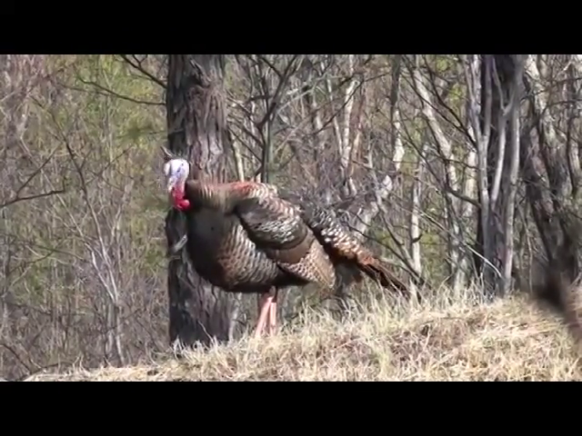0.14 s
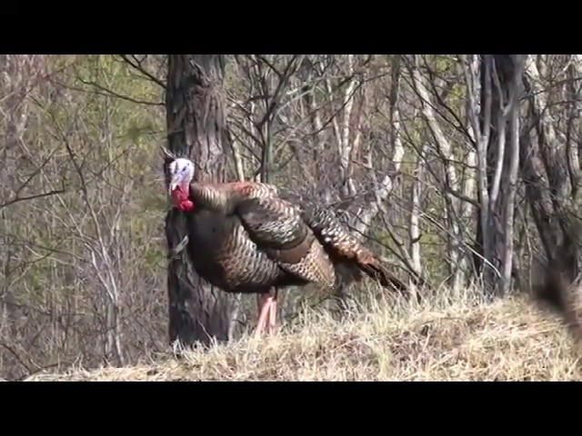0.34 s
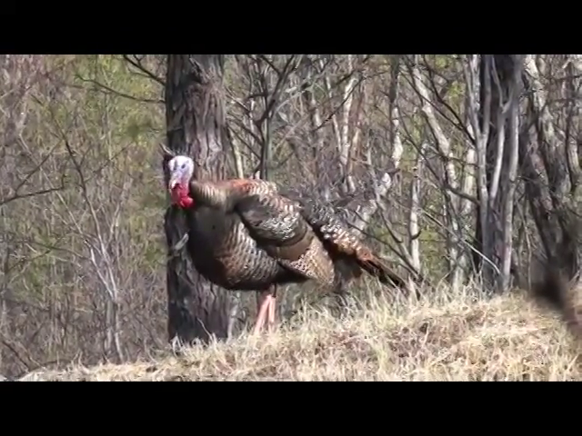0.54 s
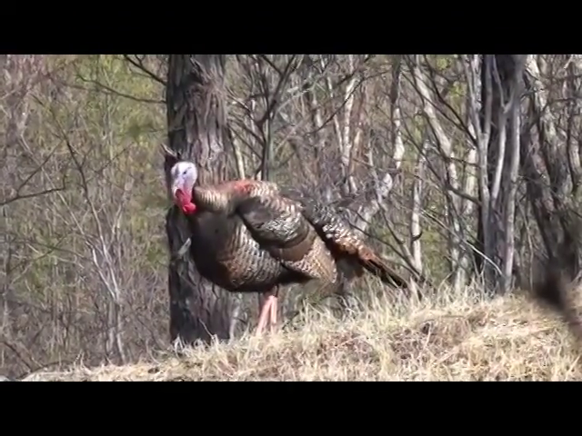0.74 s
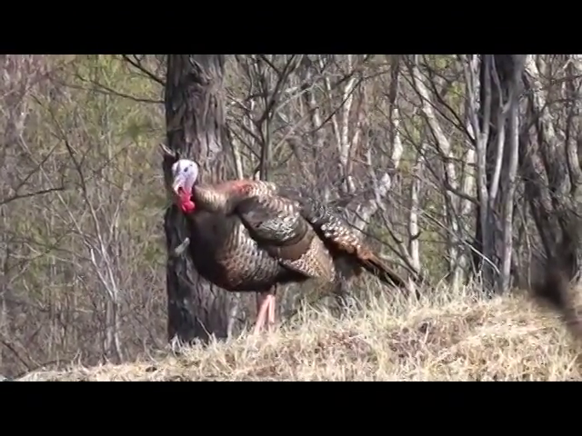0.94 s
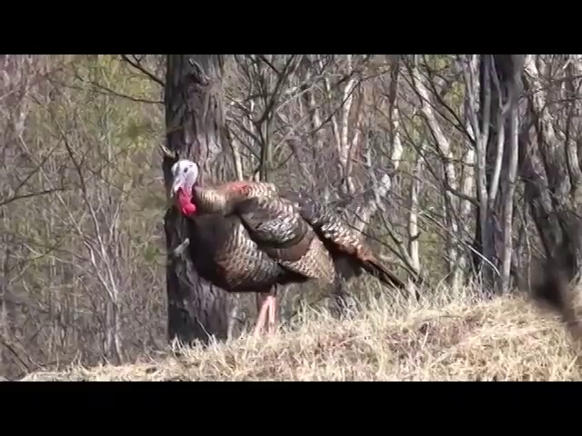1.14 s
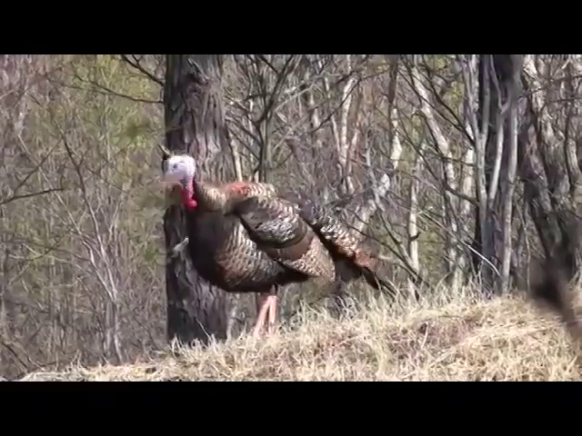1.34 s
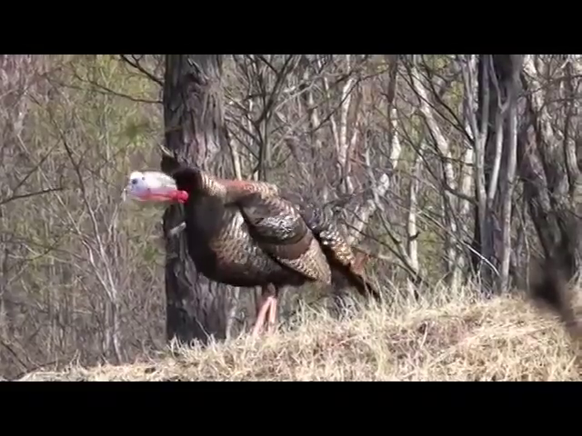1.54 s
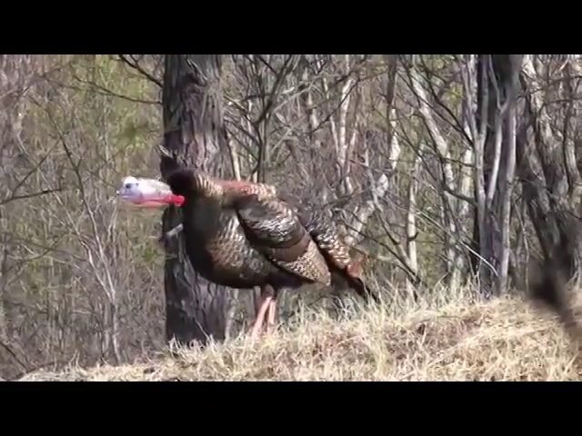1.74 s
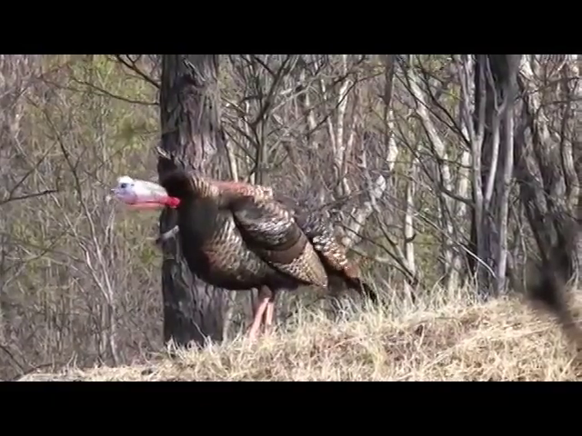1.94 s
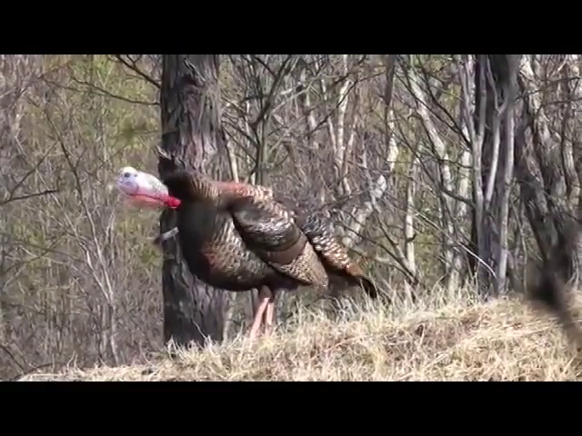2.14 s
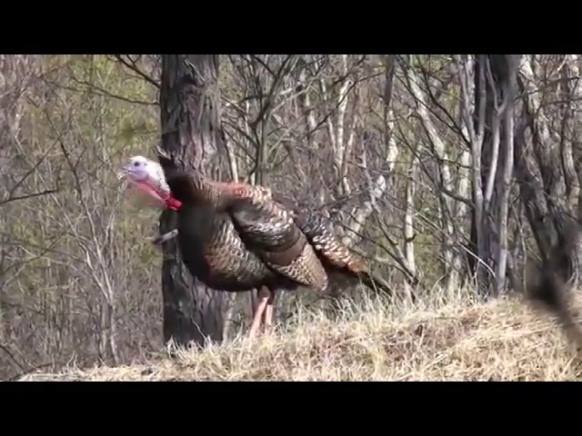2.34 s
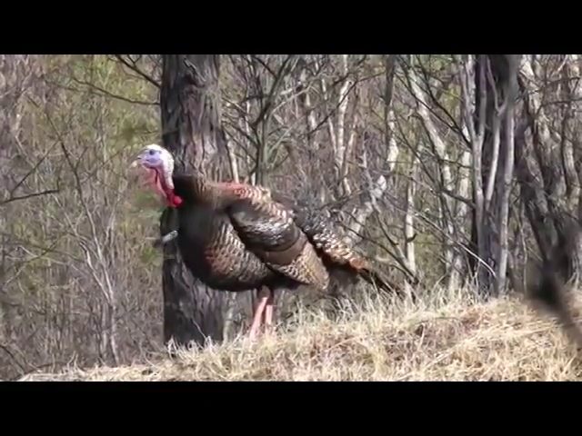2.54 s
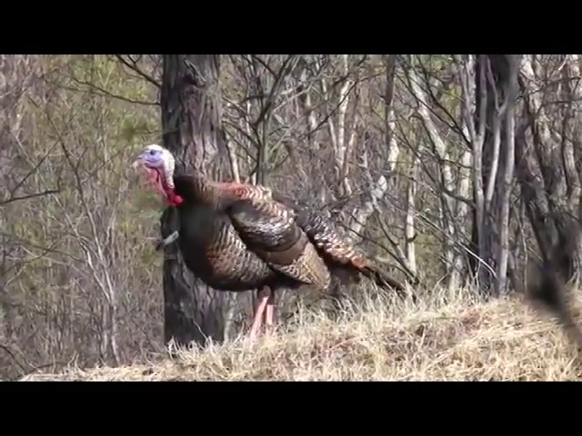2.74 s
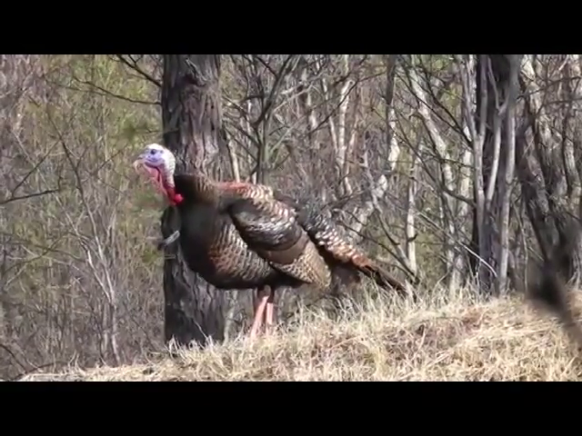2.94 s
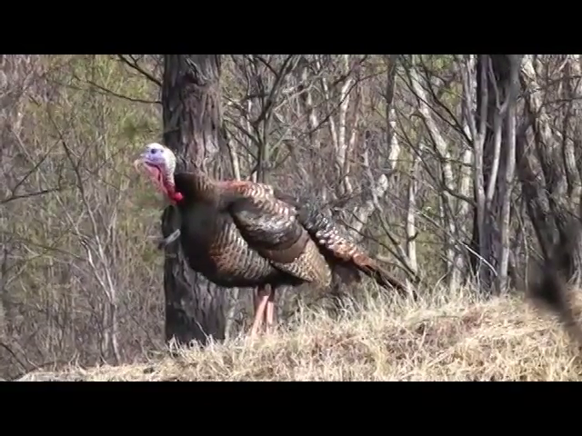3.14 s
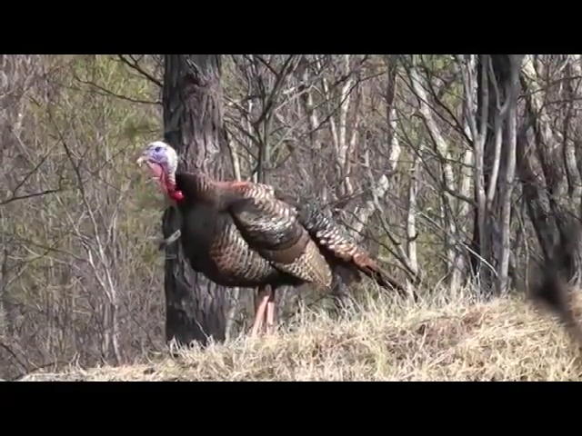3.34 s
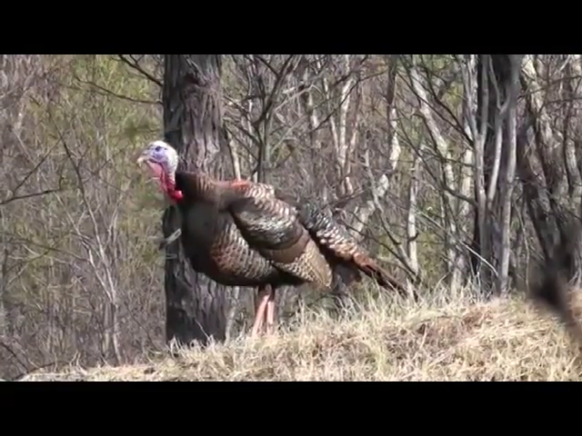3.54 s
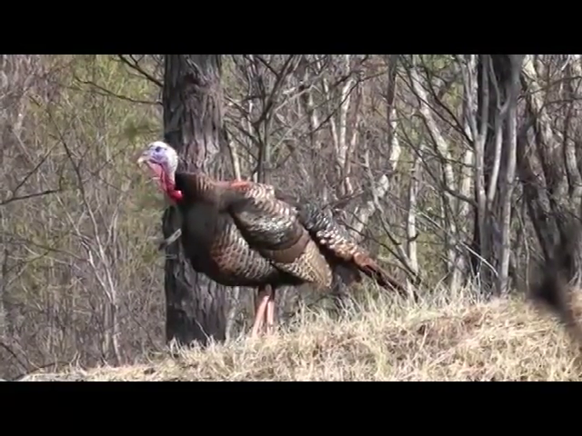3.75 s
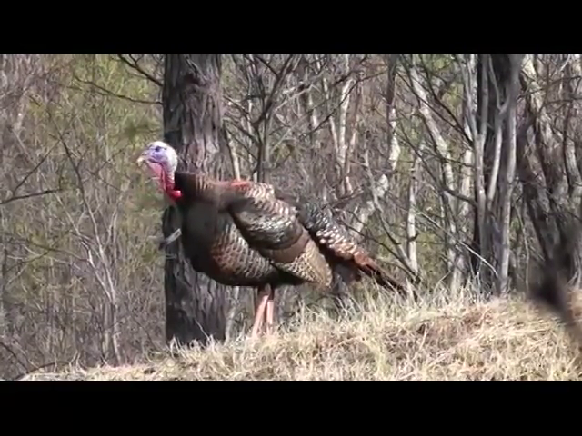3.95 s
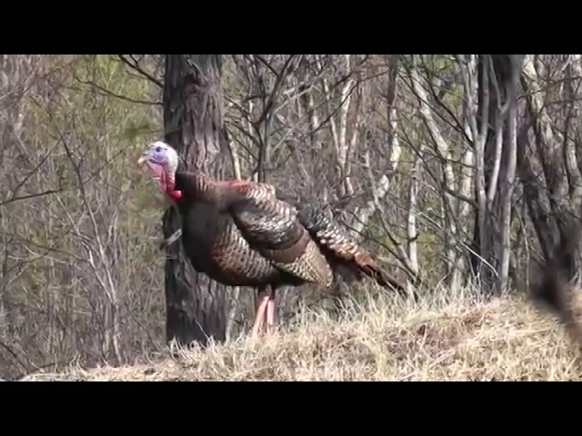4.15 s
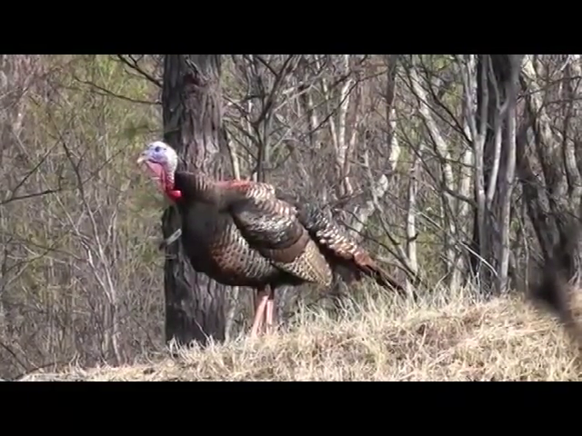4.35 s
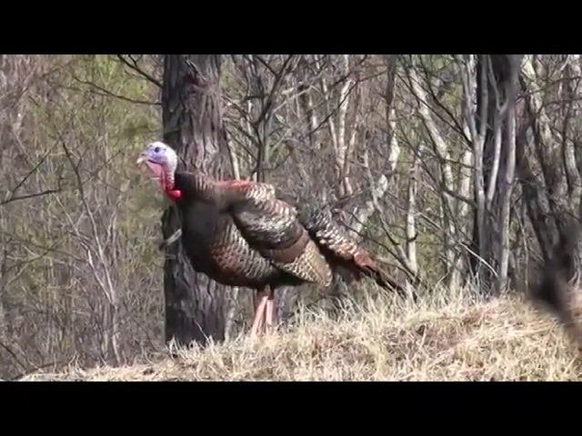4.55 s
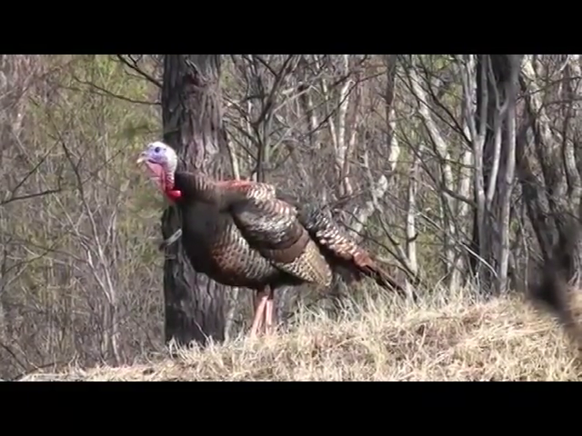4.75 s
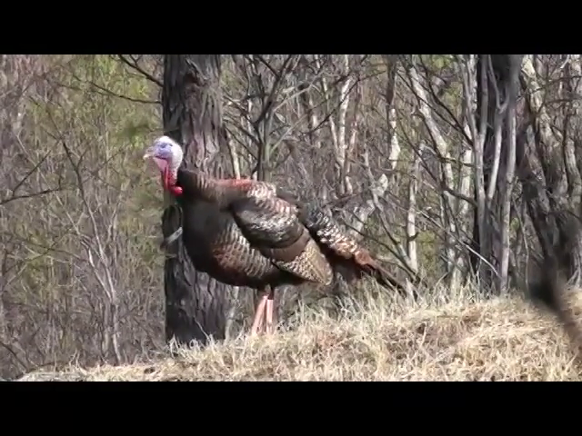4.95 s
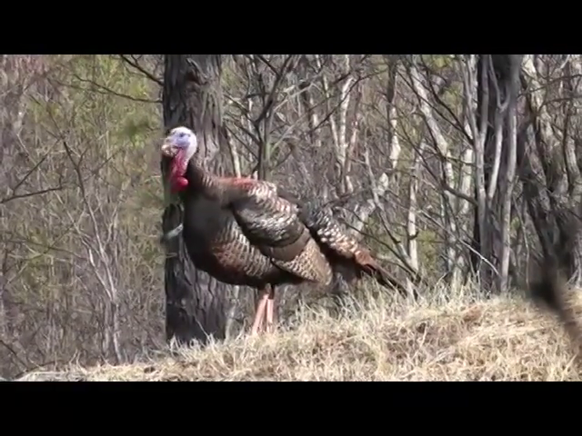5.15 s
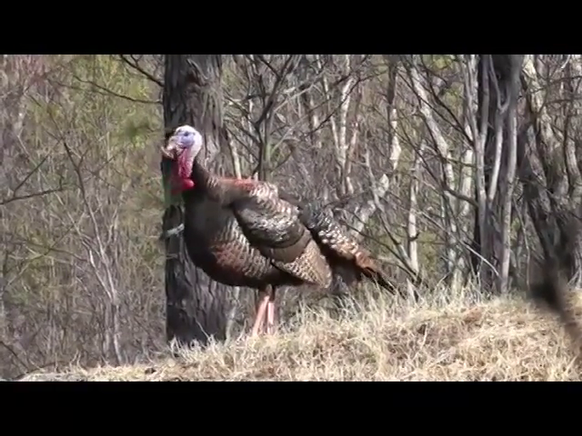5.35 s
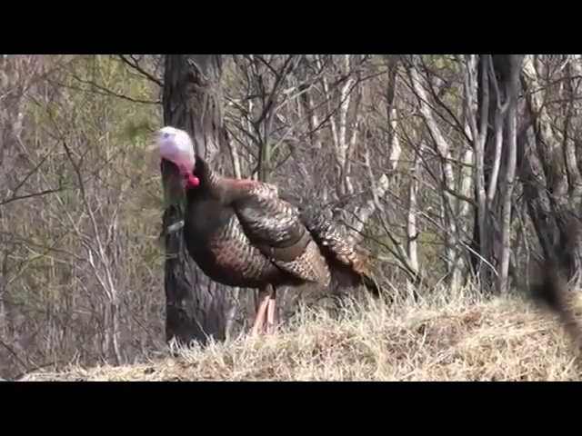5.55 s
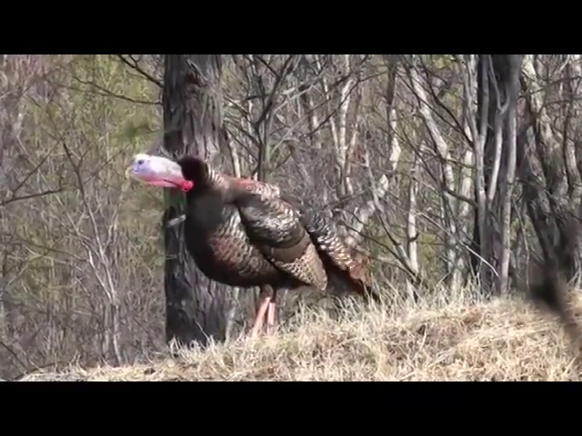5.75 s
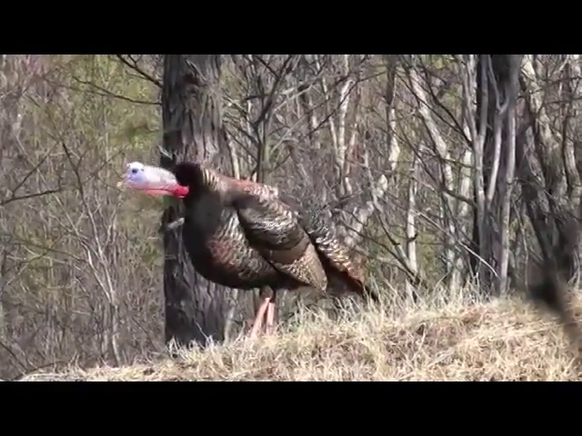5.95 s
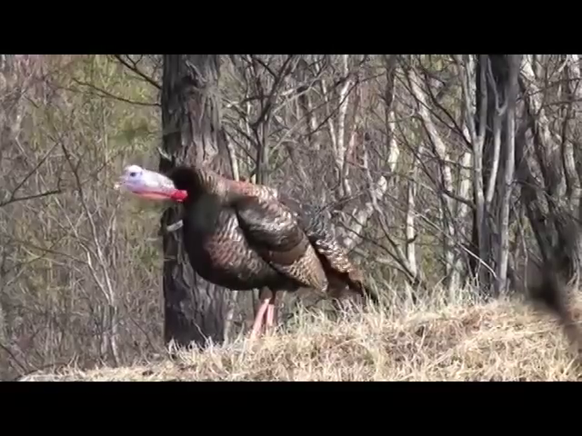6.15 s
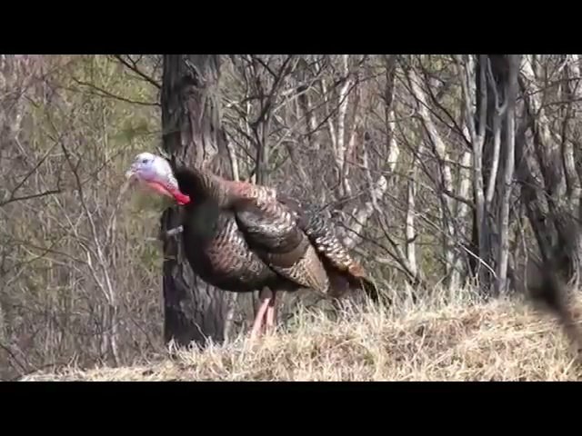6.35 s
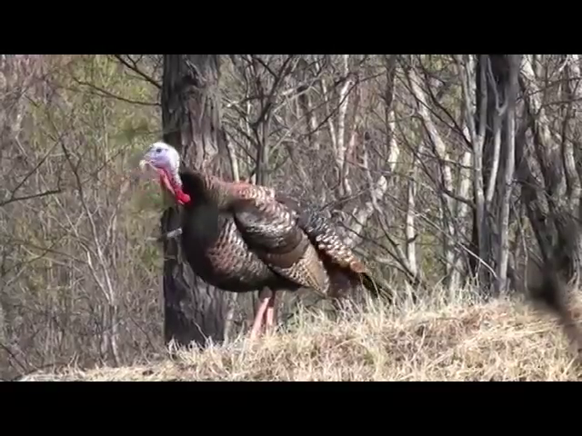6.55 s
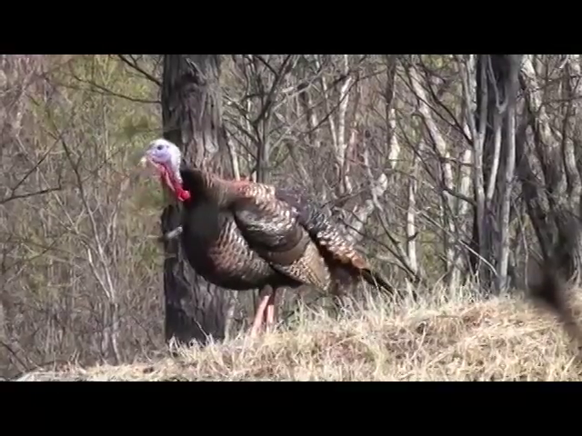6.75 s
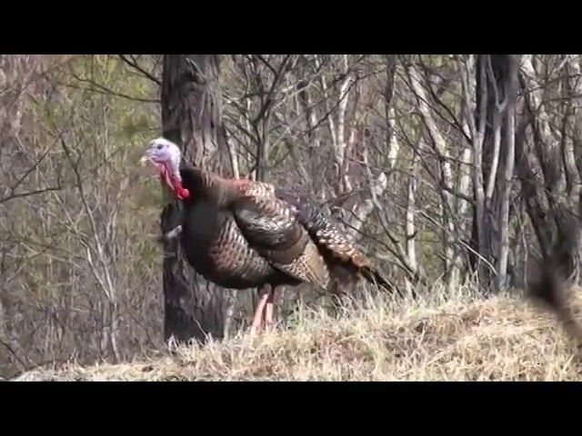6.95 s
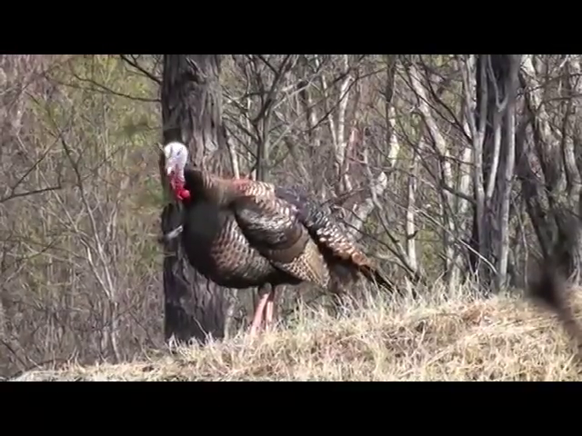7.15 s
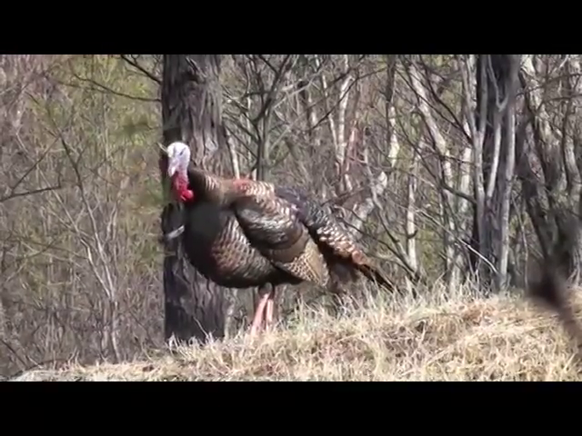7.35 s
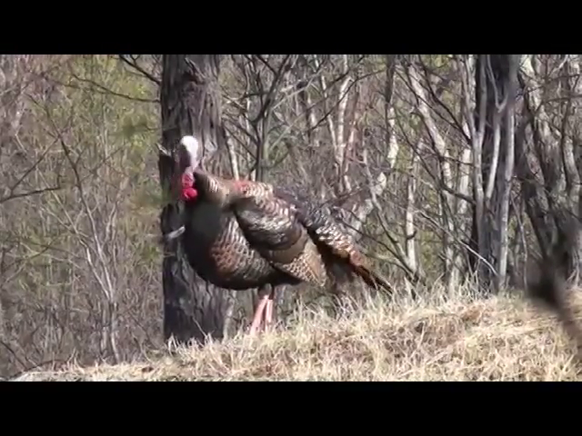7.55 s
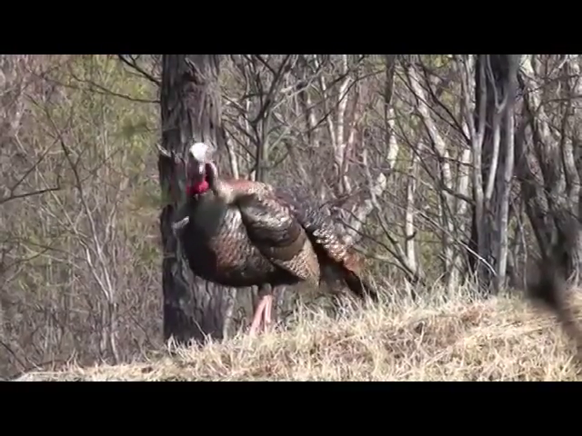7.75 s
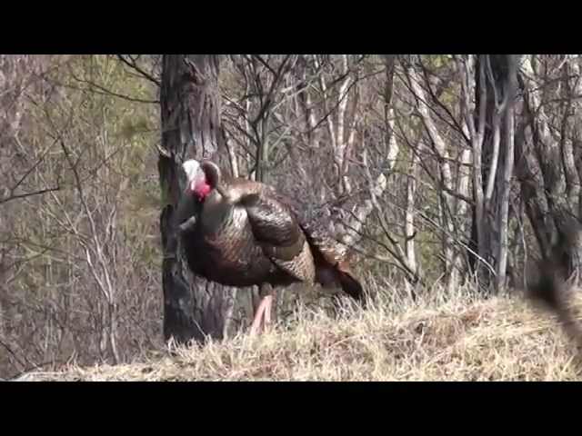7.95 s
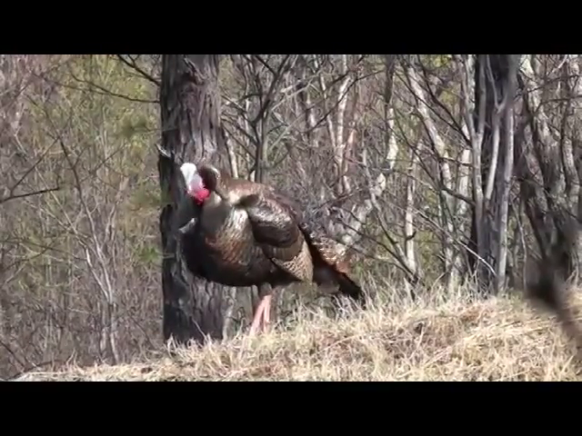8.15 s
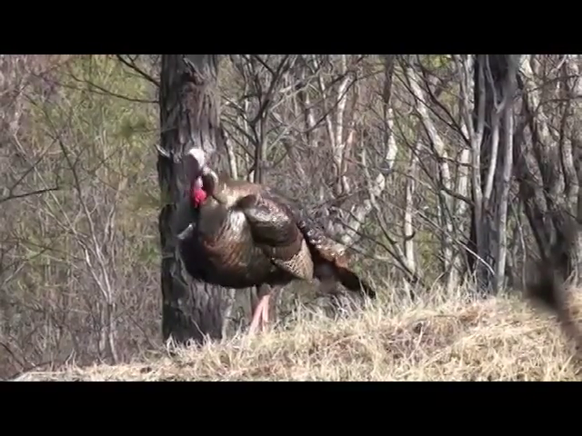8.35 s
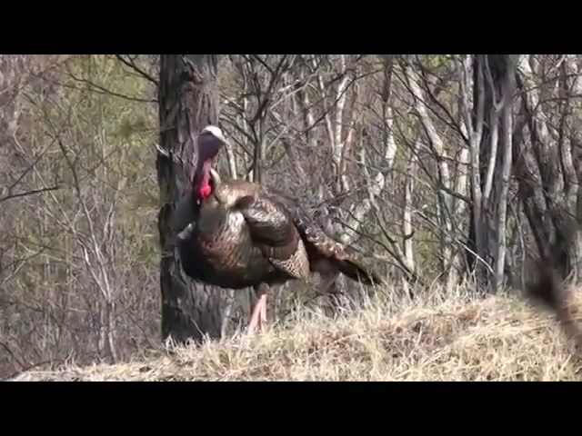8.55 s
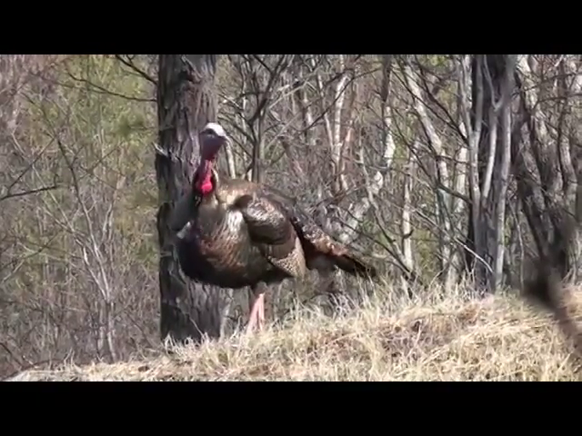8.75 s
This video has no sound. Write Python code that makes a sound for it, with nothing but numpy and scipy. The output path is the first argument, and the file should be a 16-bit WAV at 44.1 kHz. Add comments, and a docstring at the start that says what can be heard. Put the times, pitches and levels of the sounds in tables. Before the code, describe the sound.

Close raspy hen-like yelps from a reed call on the left, answered by a wild turkey's rattling gobbles among bare trees, with wind buffeting.

```python
"""Wind buffets the microphone ports over a steady hush; then hen yelps from a reed call come close on the left.
A wild turkey among bare trees answers with three gobbles: pulses and breath excite windpipe resonances.
Yelps are sums of harmonics with pulsing hiss; small birds far off are gliding sines, a twig a noise burst.
Decaying noise makes the echo of the wood, and a slow-release limiter ducks everything after loud sounds."""
import sys
import numpy as np
from scipy import signal
from scipy.fft import rfft, irfft
from scipy.io import wavfile
from scipy.ndimage import uniform_filter1d

SR = 44100
rng = np.random.default_rng(int(sys.argv[2]) if len(sys.argv) > 2 else 0)


def inscribe(sig):
    """Save sig as 16-bit PCM at rate SR to the path in sys.argv[1].

    A 1-D sig is mono; a 2-D sig holds one channel per row.
    Samples are clipped to [-1, 1] before scaling.
    """
    pcm = np.round(np.clip(np.atleast_2d(sig).T, -1, 1) * 32767)
    wavfile.write(sys.argv[1], SR, pcm.astype(np.int16))


N = 392049


def from_db(db):
    """Logarithmic level: 20 dB is a factor of ten in amplitude."""
    return 10 ** (np.asarray(db) / 20)


def at_hz(points, hz):
    """Spectral envelope: table values interpolated on a log-frequency axis."""
    table_hz, values = np.transpose(points)
    return np.interp(np.log(hz), np.log(table_hz), values)


def smooth_noise(hz, size):
    """Low-pass filtering: two equal poles leave noise wandering at about hz, with spread 1."""
    pole = np.exp(-2 * np.pi * hz / SR)
    noise = rng.standard_normal(2 * size)
    wander = signal.lfilter([1], [1, -2 * pole, pole * pole], noise)[size:]   # settled half
    return wander / wander.std()


def resonate(x, hz, width_hz):
    """Cascaded resonance: two equal resonators rise softly; a unit click peaks near 1."""
    radius, angle = np.exp(-np.pi * width_hz / SR), 2 * np.pi * hz / SR
    poles = [1, -2 * radius * np.cos(angle), radius * radius]
    gain = 2 * np.e * (1 - radius) * np.sin(angle) ** 2
    return signal.lfilter([gain], np.convolve(poles, poles), x)


def highpass(x, order, hz):
    """High-pass filtering: a Butterworth slope removes what lies below hz."""
    return signal.sosfilt(signal.butter(order, hz, "high", fs=SR, output="sos"), x)


def add(out, start_s, x):
    """Superposition: mix x in from a start time."""
    i = round(start_s * SR)
    out[..., i:i + x.shape[-1]] += x[..., :N - i]


# likeness of the two ports: (frequency [Hz], left-right correlation [0-1])
PORT_LIKENESS = [(60, 0.55), (130, .55), (300, .15), (3100, 0.54), (6800, 0.83), (15000, 1)]


def coloured_noise(spectrum):
    """Partial coherence: shaped mid and side noise sets the likeness of the ports; overall rms 1."""
    hz = np.maximum(np.fft.rfftfreq(N, 1 / SR), 1)
    mid, side = rfft(rng.standard_normal((2, N))) * from_db(at_hz(spectrum, hz))
    alike = at_hz(PORT_LIKENESS, hz)
    out = irfft(np.sqrt(1 + alike) * mid + np.sqrt(1 - alike) * side * [[1], [-1]], N)
    return out / out.std()


# course of the wind before its lumps: (time [s], level [dB])
WIND_COURSE = [(0, -55.5), (.45, -54), (.6, -44), (.78, -50), (1.2, -59), (1.9, -52), (2.6, -39),
               (3.15, -33), (3.7, -39), (4.2, -52), (4.8, -45), (5.2, -59), (6.2, -48.5), (6.7, -59),
               (7.8, -56), (8.3, -52), (8.6, -42)]
# spectrum of the rumble: (frequency [Hz], relative density [dB])
WIND_SPECTRUM = [(20, -16.5), (54, 3.5), (102, 2), (150, -8.5), (289, -29.5), (520, -62), (2000, -95)]


def wind(lumpy_db=4.5, gusty_db=5.0, flap_db=-8.0, flap_follows=.6):
    """Turbulent pressure: shared lumps modulate partly alike port noise; strong gusts reach higher."""
    s, course_db = np.transpose(WIND_COURSE)
    db = np.interp(np.arange(N) / SR, s, course_db)
    lumps = lumpy_db * np.array([smooth_noise(7.6, N), smooth_noise(23, N)])   # own rate in each channel
    lumps += gusty_db * smooth_noise(6.1, N)   # shared by both
    rumble = coloured_noise(WIND_SPECTRUM)
    flap = highpass(rumble, order=2, hz=110)
    flap_gain = from_db(flap_db + flap_follows * (db - db.max()))
    return from_db(db + lumps) * (rumble + flap_gain * flap) * from_db([[1.2], [-1.2]])


# spectrum of the steady hush: (frequency [Hz], relative density [dB])
AIR_SPECTRUM = [(120, -38), (200, -0.5), (471, -2.5), (1190, -11), (1650, -16.5), (2910, -23.5),
                (10800, -26), (14500, -31), (15600, -43)]


def air_hush(level_db=-55.5):
    """Stationary noise: one fixed spectrum at a constant level."""
    return from_db(level_db) * coloured_noise(AIR_SPECTRUM)


def cluck(hz, swell_s, fall):
    """Damped oscillation: a swelling and dying tone whose pitch sags; envelope peak 1."""
    t = np.arange(round(.06 * SR)) / SR
    shape = (t / swell_s * np.exp(1 - t / swell_s)) ** 3.2
    return shape * np.sin(2 * np.pi * hz * t * (1 + fall * (1 - t / (2 * swell_s))))


# envelope over the reed's harmonics: (frequency [Hz], relative level [dB])
REED_SPECTRUM = [(400, -23.5), (715, -12), (1120, -3), (1700, -4.5), (2250, -1), (2880, -11), (3700, -24),
                 (4600, -41), (5800, -48), (7300, -24), (8600, -60)]
# side on which the reed is heard: (frequency [Hz], left minus right [dB])
REED_LEAN = [(300, 1.5), (700, 7.5), (1290, 14), (2380, 7.5), (4400, 3), (8120, 5), (12000, 0.5)]
# spectrum of the air through the reed: (frequency [Hz], relative level [dB])
REED_AIR = [(300, -27.5), (1100, -4.5), (2400, 12), (3500, -8), (4300, -16), (5000, -27), (6300, -30),
            (7300, -17), (8000, -29), (8650, -58), (9200, -31), (9700, -27), (10600, -31), (11400, -26),
            (12600, -36), (13600, -30), (14900, -25)]
# first harmonic against the envelope: (middle pitch [Hz], lift [dB])
FIRST_HARMONIC = [(700, 1.5), (770, 0), (830, -5), (950, -3), (1100, -4), (1200, -7), (1400, 2), (1600, 3)]
# clear: low clean opening; raspy: high hoarse opening; smooth: high opening without rasp;
# held: high register carried on; low: after the break; rise: slide up; squeak: the reed pinches shut.
# stage: (start against middle [dB], end against middle [dB], roughness [0-1], treble lift [dB],
#         first harmonic lift [dB])
YELP_STAGES = {"clear": (6, -6.5, .07, 5, 10), "raspy": (7.5, 1.5, .3, 0, 0), "smooth": (9, 1, .15, 2, -1),
               "held": (-1, -1, .08, 4, 2), "low": (1, -6, .12, 0, 0), "rise": (-5, -9, .2, 2, 0),
               "squeak": (9, -14, .36, -1, 2)}
# reed notes before jitter and opening slides: (stage, start [s], end [s], start pitch [Hz],
#         middle pitch [Hz], end pitch [Hz], middle level [dB])
YELP_NOTES = [("clear", .697, .736, 916, 902, 1050, -9), ("held", .737, .787, 1086, 1400, 1430, -12),
              ("held", .787, .851, 1486, 1170, 1177, -10.5), ("rise", .853, .874, 1205, 1447, 1670, -14.5),
              ("raspy", .957, .976, 1140, 1120, 1133, -10), ("low", .975, 1.027, 730, 747, 860, -12),
              ("squeak", 1.024, 1.034, 1500, 1600, 1700, -27),
              ("raspy", 1.159, 1.189, 1418, 1106, 1080, -13), ("low", 1.19, 1.229, 680, 712, 840, -14),
              ("squeak", 1.226, 1.237, 1450, 1550, 1650, -27),
              ("raspy", 1.398, 1.421, 1160, 1090, 1040, -14), ("low", 1.421, 1.454, 680, 700, 790, -15),
              ("squeak", 1.452, 1.47, 1450, 1480, 1600, -23),
              ("raspy", 1.639, 1.666, 1233, 1001, 1134, -16.5), ("low", 1.668, 1.694, 673, 700, 790, -18),
              ("squeak", 1.692, 1.708, 1450, 1550, 1750, -24),
              ("clear", 4.962, 5.001, 840, 836, 980, -14.5), ("rise", 5.0, 5.02, 974, 1156, 1470, -19.5),
              ("smooth", 5.075, 5.11, 1240, 1195, 1090, -12.5), ("low", 5.109, 5.142, 800, 840, 878, -11.5),
              ("squeak", 5.139, 5.16, 1480, 1456, 1570, -22),
              ("raspy", 5.263, 5.296, 1358, 1082, 1020, -11.5), ("low", 5.298, 5.336, 711, 762, 850, -11.5),
              ("squeak", 5.331, 5.347, 1600, 1680, 1750, -23),
              ("raspy", 5.495, 5.54, 1230, 1120, 1110, -15.5), ("low", 5.531, 5.557, 682, 760, 790, -17),
              ("squeak", 5.554, 5.574, 1370, 1440, 1430, -21),
              ("raspy", 5.748, 5.773, 1250, 1036, 1100, -15), ("low", 5.775, 5.804, 661, 699, 780, -16),
              ("squeak", 5.801, 5.817, 1500, 1520, 1600, -22),
              ("clear", 6.864, 6.892, 903, 937, 1030, -11.5), ("low", 6.891, 6.905, 653, 730, 800, -14),
              ("squeak", 6.906, 6.928, 1240, 1340, 1390, -21),
              ("smooth", 6.972, 6.996, 1320, 1206, 1198, -11), ("low", 6.994, 7.022, 787, 835, 840, -17),
              ("rise", 6.996, 7.039, 1192, 1314, 1570, -15),
              ("smooth", 7.126, 7.161, 1373, 1238, 1114, -13), ("held", 7.16, 7.197, 1152, 1138, 1205, -12),
              ("squeak", 7.197, 7.221, 1460, 1563, 1660, -20),
              ("raspy", 7.335, 7.375, 1310, 1113, 1130, -15), ("low", 7.374, 7.409, 708, 760, 840, -15.5),
              ("squeak", 7.405, 7.421, 1550, 1600, 1700, -24),
              ("raspy", 7.563, 7.58, 1300, 1190, 1170, -14), ("held", 7.579, 7.595, 1010, 1004, 990, -13),
              ("low", 7.595, 7.623, 712, 725, 820, -15), ("squeak", 7.621, 7.639, 1506, 1600, 1700, -23),
              ("raspy", 7.801, 7.824, 1257, 1075, 1157, -13), ("low", 7.824, 7.854, 690, 714, 768, -15),
              ("squeak", 7.852, 7.878, 1320, 1498, 1680, -27),
              ("raspy", 8.026, 8.051, 1167, 1095, 963, -15.5), ("low", 8.05, 8.086, 681, 684, 780, -17),
              ("squeak", 8.083, 8.095, 1350, 1480, 1600, -28),
              ("clear", 8.751, 8.787, 1084, 934, 1056, -12),
              ("rise", 8.788, 8.814, 1146, 1380, 1730, -13.5), ("raspy", 8.845, 8.88, 1392, 1160, 975, -14),
              ("low", 8.88, 8.898, 860, 818, 840, -13)]


def yelps(jitter=0.1, hiss_db=-18.5, rasp=.6, edge_s=.002, pop_db=17.0, pop_s=0.014, treble=.8,
          patchy_db=2.2, crack=.6, spread=.3, blur=0.37, catch_s=.015, catch_slide=.2, catch_dip=.6,
          settle_s=.036, top_varies_db=2.5, uneven_db=2.5, lead_in_db=-19.0, lead_in_s=.006,
          kick=.17, kick_s=.004, thump_db=-22.0, thump_hz=310):
    """Self-sustained reed oscillation: wandering harmonics of a latex reed, hiss pulsing with each cycle."""
    out = np.zeros((2, N))
    air = np.zeros((3, N))   # rasp, thin hiss, and the top that differs from note to note
    order = np.arange(1, 12)[:, None]
    for stage, start, end, start_hz, middle_hz, end_hz, db in YELP_NOTES:
        start_db, end_db, rough, treble_db, first_db = YELP_STAGES[stage]
        opening = stage in ("clear", "raspy", "smooth")
        t = np.arange(round((end - start + 2 * edge_s) * SR)) / SR
        u = np.minimum(t / (end - start), 1)
        pitch = np.polyval(np.polyfit([0, .5, 1], [start_hz, middle_hz, end_hz], 2), u)
        level = from_db(db + np.interp(u, [0, .5, 1], [start_db, 0, end_db]))
        level *= np.clip(np.minimum((t / (1.6 * edge_s)) ** 2, (t[-1] - t) / (2 * edge_s)), 0, 1)

        if stage in ("raspy", "smooth"):   # the first puff bends the reed sharp
            pitch *= 1 + kick * np.exp(-t / kick_s)
        if opening:   # it also thumps in the open mouth, in the left channel
            thump = from_db(db + thump_db) * cluck(thump_hz, swell_s=.006, fall=.2)
            add(out, start, thump * [[1], [0]])
            # a faint noise ramp leads into each opening note
            lead_in = np.linspace(0, 1, round(lead_in_s * SR))
            lead_in_noise = lead_in * rng.standard_normal(len(lead_in))
            add(air[0], start - lead_in_s + edge_s, from_db(db + lead_in_db) * lead_in_noise)
        if stage == "raspy":   # the reed catches, slides up and slips back, then settles
            slips = rng.uniform(.15, .35) + t / (catch_s * rng.uniform(.9, 1.1))
            settling = np.exp(-t / settle_s)
            pitch *= 1 + catch_slide * settling * (slips % 1 - .5)
            level *= 1 - catch_dip * settling * np.cos(np.pi * slips) ** 8

        rough = rough * (1 + crack * u ** 6)   # the tone cracks as the note ends
        jittered = pitch * (1 + jitter * rough * smooth_noise(150, len(t)))
        phase = 2 * np.pi * np.cumsum(jittered) / SR
        heights = from_db(at_hz(REED_SPECTRUM, order * pitch))
        uneven = uneven_db * (order > 1) * rng.standard_normal(order.shape)
        heights *= from_db(treble_db * (order * pitch > 5500) + uneven)
        pop = opening * pop_db * np.exp(-t / pop_s)   # dull while the mouth opens
        heights[0] *= from_db(first_db + at_hz(FIRST_HARMONIC, middle_hz) + pop)
        heights /= np.sqrt(np.sum(heights ** 2, axis=0) / 2)

        # three slow noises shared out among the harmonics
        flutter = np.array([smooth_noise(210, len(t)) for k in range(3)])[order[:, 0] % 3]
        angle = order * (phase + blur * (rough + .05) * flutter + spread * order)
        wave = heights * np.cos(angle) * level * (1 + .65 * rough * flutter)
        lean = from_db(at_hz(REED_LEAN, order * pitch) / 2)
        centred = wave * 2 / (lean + 1 / lean)   # left and right gains add up to 2
        add(out, start, np.array([np.sum(centred * lean, axis=0), np.sum(centred / lean, axis=0)]))

        thin_gain = treble * from_db(treble_db) + 0 * u
        top_gain = treble * from_db(treble_db + top_varies_db * rng.standard_normal()) + 0 * u
        air_gains = np.array([from_db(hiss_db) + rasp * rough, thin_gain, top_gain])
        pulsing = from_db(patchy_db * flutter[:1]) * (1 + .7 * np.cos(phase))
        add(air, start, level * air_gains * pulsing * rng.standard_normal(len(t)))

    hz = np.maximum(np.fft.rfftfreq(N, 1 / SR), 1)
    lean = from_db(at_hz(REED_LEAN, hz) / 2)
    low, high, top = rfft(air)
    high += (top - high) / (1 + (8600 / hz) ** 10)   # crossovers at 8600 and 5500 Hz
    hiss = low + (high - low) / (1 + (5500 / hz) ** 10)
    return out + irfft(hiss * from_db(at_hz(REED_AIR, hz)) * [lean, 1 / lean], N)


def woods(x, t60_s, delay_s, dull_hz, near_db, near_t60_s):
    """Diffuse reverberation: near trunks scatter briefly, the far wood slowly; own noise in each channel."""
    t = np.arange(round(1.2 * SR)) / SR
    far = from_db(-60 * t / t60_s) * np.clip(t / delay_s, 0, 1)
    near = from_db(near_db - 60 * t / near_t60_s)
    echo = rng.standard_normal((2, len(t))) * (far + near)
    echo = signal.sosfilt(signal.butter(1, dull_hz, fs=SR, output="sos"), echo)
    echo /= np.sqrt(np.sum(echo[0] ** 2))
    return signal.fftconvolve(x[None], echo, axes=1)[:, :N]


def rattle(length_s, period_s, after_db, fade_db, breath_db):
    """Pulsed excitation: a unit pulse, uneven ones behind it, and a puff of breath noise."""
    pulses = np.zeros(round(.15 * SR)) + 1e-18
    time_draws, size_draws = rng.standard_normal((2, 12))
    at = period_s * (np.arange(12) + 0.213 * time_draws)
    at[0] = 0
    sizes = from_db(after_db - fade_db * np.arange(-1, 11) + 3 * size_draws) * (at < length_s)
    sizes[0] = 1
    np.add.at(pulses, np.clip(at * SR, 0, len(pulses) - 1).astype(int), sizes)
    u = np.arange(len(pulses)) / SR / (.48 * length_s)
    puff = (u * np.exp(1 - u)) ** 2.2
    return pulses, from_db(breath_db) * puff * rng.standard_normal(len(pulses))


def reshuffled(noise):
    """Decorrelation: random signs keep the puff's envelope and change its fine detail."""
    return noise * rng.choice([-1, 1], len(noise))


def between_modes(x):
    """Broadband transmission: the 1300-7200 Hz breath between the resonances."""
    return signal.sosfilt(signal.butter(3, [1300, 7200], "band", fs=SR, output="sos"), x)


# hoarse opening squawks, beak wide: (time [s], relative level [dB], length [s], voice pitch [Hz])
SQUAWK_NOTES = [(1.506, -23, 0.036, 903), (1.524, -28, 0.032, 974), (1.571, -23.5, 0.039, 1037),
                (1.596, -20, 0.028, 877), (5.628, -22.5, 0.032, 746), (5.645, -25, 0.03, 1291),
                (5.702, -26, 0.035, 1280), (5.728, -15, 0.02, 1251), (7.878, -23.5, 0.037, 1290),
                (7.908, -22, 0.021, 889)]
# resonances of the open beak: (frequency [Hz], width [Hz], relative level [dB])
BEAK_MODES = [(669.6, 90, -14), (900, 170, -7), (1443, 220, 0), (2650, 120, -32.5), (3580, 300, -16),
              (4100, 380, -13), (4750, 600, -16), (5450, 500, -22)]


def squawks(rasp_db=-3.0):
    """Formant resonance: rough pulses and breath ring the open beak around a voiced slide."""
    out = np.zeros(N)
    for s, db, length_s, voice_hz in SQUAWK_NOTES:
        pulses, breath = rattle(length_s, period_s=0.007, after_db=2.5, fade_db=0, breath_db=-18.)
        x = from_db(rasp_db) * between_modes(breath + .15 * pulses)
        for hz, width_hz, mode_db in BEAK_MODES:
            x += from_db(mode_db) * resonate(.15 * pulses + reshuffled(breath), hz, width_hz)
        add(out, s - .003, from_db(db - 2) * x)
        voice = cluck(voice_hz, swell_s=.42 * length_s, fall=.18)
        voice += .5 * cluck(1.4 * voice_hz, swell_s=.3 * length_s, fall=.12)
        add(out, s, from_db(db - 2.5) * voice)
    return out


# windpipe modes before neck shifts and widening: (frequency [Hz], width [Hz], relative level [dB])
PIPE_MODES = [(612.2, 46, -10), (1000, 62, 0), (1685, 36.3, -14), (2400, 140, -24.5), (3040, 120, -33),
              (3570, 100, -29.5), (4191, 90, -21), (4780, 130, -33), (5350, 180, -33), (5980, 200, -34),
              (6750, 500, -40), (9400, 1000, -40), (12200, 1800, -44)]
# the neck draws back and the resonances sink: (time before the last syllable [s], main mode [Hz],
#         upper mode [Hz], low mode lift [dB], strength passed from upper mode to its neighbours [dB])
NECK_COURSE = [(0, 965, 4170, 0, 1), (.3, 1000, 4170, 0, 0), (.55, 1040, 4320, 3, 1),
               (.75, 1065, 4360, 3, 5)]
# dull: muffled, between beats; lead: throaty upbeat; full: all modes ring; pure: mostly the main mode;
# held: drawn out; after: weak afterbeat; wide: beak still open, neck not yet stretched.
# kind: (main mode factor [ratio], low mode over breath [dB], swell [s], second pulse [dB],
#         strength passed from upper mode to its neighbours [dB])
SYLLABLE_KINDS = {"dull": (1.0, 14, .005, -8, 3), "lead": (.93, 11, .004, -7, 0),
                  "full": (1.0, 7, .0056, -6.5, 0), "pure": (1.01, 10, .0066, -11, 4),
                  "held": (1.0, 8, .012, -6, 0), "after": (.98, 1, .0045, -12, 5),
                  "wide": (1.0, 2, .0056, -6.5, 7)}
# one list per gobble: (kind, time [s], relative cluck level [dB], relative breath level [dB])
GOBBLE_SYLLABLES = [
    [("dull", 1.712, -22, -47), ("pure", 1.754, -12, -42.5), ("held", 1.768, -24, -48),
     ("dull", 1.827, -21, -50.5), ("full", 1.867, -13, -37.5), ("after", 1.884, -30, -44),
     ("full", 1.919, -10, -36), ("held", 1.934, -18.5, -41), ("pure", 1.954, -10.5, -39.5),
     ("lead", 1.997, -21.5, -43.5), ("dull", 2.011, -24.5, -42), ("full", 2.059, -12.5, -35.5),
     ("pure", 2.102, -10.5, -44), ("lead", 2.168, -20.5, -38.5), ("full", 2.191, -19.5, -39),
     ("full", 2.236, -11.5, -35.5), ("after", 2.246, -20, -47), ("pure", 2.282, -7, -50.5),
     ("lead", 2.368, -24, -40), ("full", 2.393, -13.5, -34), ("pure", 2.441, -11.5, -42)],
    [("dull", 5.865, -19, -40), ("pure", 5.907, -14, -39), ("held", 5.918, -23, -48),
     ("dull", 5.938, -34.5, -39), ("dull", 5.974, -23.5, -45), ("full", 6.02, -9.5, -36),
     ("after", 6.036, -28, -47), ("full", 6.069, -8, -37), ("held", 6.084, -13, -44.5),
     ("after", 6.152, -18, -42), ("dull", 6.16, -14.5, -38), ("dull", 6.178, -22, -39),
     ("full", 6.218, -11, -34.5), ("pure", 6.264, -9, -46.5), ("lead", 6.335, -21, -38.5),
     ("lead", 6.365, -30.5, -43), ("full", 6.404, -12, -37), ("pure", 6.449, -11, -47)],
    [("wide", 7.966, -29, -36), ("wide", 8.014, -11, -30.5), ("dull", 8.13, -25, -48.5),
     ("full", 8.172, -11.5, -33.5), ("full", 8.223, -8, -36), ("lead", 8.297, -16.5, -36),
     ("after", 8.324, -23, -33.5), ("full", 8.368, -7, -34), ("held", 8.386, -22, -46),
     ("pure", 8.406, -18, -47.5), ("lead", 8.51, -23, -41), ("after", 8.538, -13, -36),
     ("after", 8.548, -14, -39), ("pure", 8.585, -11.5, -43)],
]


def gobbles(widen=1.33, gap_db=24.0, rattle_s=0.025):
    """Source and filter: pulses cluck at the main mode, breath fills the pipe modes, the neck shifts them."""
    out = np.zeros(N)
    pipe = np.array(PIPE_MODES)
    neck_s, neck_main_hz, neck_upper_hz, neck_low_db, neck_passed_db = np.transpose(NECK_COURSE)
    syllables = [(*row, gobble[-1][1]) for gobble in GOBBLE_SYLLABLES for row in gobble]
    for kind, s, db, breath_db, last_s in syllables:
        factor, low_db, swell_s, second_db, passed_db = SYLLABLE_KINDS[kind]
        left_s = last_s - s
        passed_db += np.interp(left_s, neck_s, neck_passed_db)
        upper_db = breath_db - db
        low_db += upper_db + np.interp(left_s, neck_s, neck_low_db)
        main_hz = factor * np.interp(left_s, neck_s, neck_main_hz) * (1 + .014 * rng.standard_normal())
        stretch = 1 if kind == "wide" else np.interp(left_s, neck_s, neck_upper_hz) / pipe[6, 0]
        pulses, breath = rattle(rattle_s, period_s=0.012, after_db=second_db, fade_db=9.0, breath_db=-27.0)

        x = signal.fftconvolve(pulses, cluck(main_hz, swell_s, fall=.06))[:len(pulses)]
        # breathy syllables are rougher
        x += from_db(upper_db + 19.5) * resonate(breath, main_hz, 2.5 * pipe[1, 1])
        low_hz = pipe[0, 0] * (1 + 0.028 * rng.standard_normal())
        x += from_db(low_db) * resonate(0.23 * pulses + 1.68 * breath, low_hz, widen * pipe[0, 1])
        third_hz = pipe[2, 0] * stretch * (1 + 0.025 * rng.standard_normal())
        x += from_db(upper_db + 8) * resonate(0.6 * pulses + 1.4 * breath, third_hz, 2.8 * pipe[2, 1])

        passed = np.zeros(len(pipe))   # the upper mode and its two neighbours
        passed[5:8] = passed_db * (kind != "wide"), -passed_db, passed_db
        for (hz, width_hz, mode_db), shift_db in zip(pipe[3:], passed[3:]):
            gain = from_db(upper_db + mode_db + shift_db + 30 + 2.5 * rng.standard_normal())
            mode_hz = hz * stretch * (1 + 0.011 * rng.standard_normal())
            x += gain * resonate(reshuffled(breath), mode_hz, width_hz + 70)
        x += from_db(upper_db + gap_db) * between_modes(breath)
        add(out, s - .003, from_db(db) * x)
    return out


# songbird phrases: (start [s], end [s], start pitch [Hz], end pitch [Hz], note rate [1/s],
#         fall in each note, a rise if negative [Hz], relative level [dB])
SONG_PHRASES = [(2.5, 3.049, 4975, 4900, 24, 330, -53), (3.04, 3.135, 4550, 4450, 21, 300, -57),
                (3.078, 3.272, 3850, 3780, 20.6, -1500, -54), (7.45, 7.555, 7000, 7150, 9.1, 30, -58),
                (7.739, 7.797, 6600, 7040, 11, 30, -52), (8.425, 8.515, 7750, 8150, 11, 30, -50),
                (8.59, 8.745, 6600, 7300, 6.4, 30, -49.5), (8.715, 8.76, 7500, 8400, 22, 30, -46)]


def songbirds():
    """Frequency modulation: trains of whistles glide within each note, their pitch blurred by distance."""
    out = np.zeros(N)
    for start, end, hz0, hz1, per_s, fall_hz, db in SONG_PHRASES:
        t = np.arange(round((end - start) * SR)) / SR
        u = t * per_s % 1   # place within the note
        pitch = hz0 + (hz1 - hz0) * t / t[-1] + fall_hz * (.5 - u)
        pitch += 70 * smooth_noise(120, len(t))
        whistle = np.sin(2 * np.pi * np.cumsum(pitch) / SR)
        add(out, start, from_db(db) * np.sin(np.pi * u) ** 3.2 * whistle)
    return out


# a dry snap: (time [s], relative level [dB])
TWIG_SNAPS = [(4.0264, -44)]


def twig():
    """Impulsive excitation: a short noise burst rings three damped resonances."""
    out = np.zeros(N)
    for s, db in TWIG_SNAPS:
        t = np.arange(900) / SR
        crack = np.exp(-t / 0.0028) * rng.standard_normal(len(t))
        ring = resonate(crack, 2520, 830) + 0.4 * resonate(crack, 2750, 500)
        ring += 0.12 * resonate(crack, 4300, 500)
        add(out, s, from_db(db) * ring / 3)
    return out


def scene():
    """Superposition of direct and scattered sound: reed near and left, bird ahead, woods around both."""
    bed = wind() + air_hush()
    reed = yelps()
    reed_echo = woods(reed[0], t60_s=0.96, delay_s=0.061, dull_hz=4500, near_db=8.0, near_t60_s=0.068)
    bird = highpass(squawks() + gobbles(), order=2, hz=380)   # the beak sends out little bass
    thin = highpass(bird, order=1, hz=3000)   # trunks scatter short waves best
    bird_echo = woods(thin, t60_s=0.9, delay_s=0.028, dull_hz=6000, near_db=8.0, near_t60_s=0.18)
    far = songbirds()
    far_echo = woods(far, t60_s=0.9, delay_s=0.017, dull_hz=7960, near_db=-0.5, near_t60_s=0.063)
    return (bed + reed + from_db(-35.5) * reed_echo
            + bird * from_db([[-.8], [.8]]) + from_db(-6.5) * bird_echo
            + from_db(-2.5) * far + from_db(-3) * far_echo + twig())


def record(dry, threshold_db=-13.5, share=0.67, release_db_s=14.0, ahead_s=0.0027, cutoff_hz=15750):
    """Dynamic compression: look-ahead gain follows the louder channel, lets go slowly; the top is cut."""
    power = uniform_filter1d(np.max(dry ** 2, axis=0), size=221)
    over = np.maximum(10 * np.log10(power + 1e-12) - threshold_db, 0)
    ramp = release_db_s * np.arange(N) / SR
    held = np.maximum.accumulate(over + ramp) - ramp   # falls along the ramp after each peak
    ahead = round(ahead_s * SR)
    held = np.maximum(held, np.r_[held[ahead:], np.zeros(ahead)])
    gain = from_db(-share * uniform_filter1d(held, size=133))
    return signal.sosfilt(signal.cheby2(12, 70, cutoff_hz, fs=SR, output="sos"), dry * gain)


dry = scene()
out = record(dry)
inscribe(out)
```